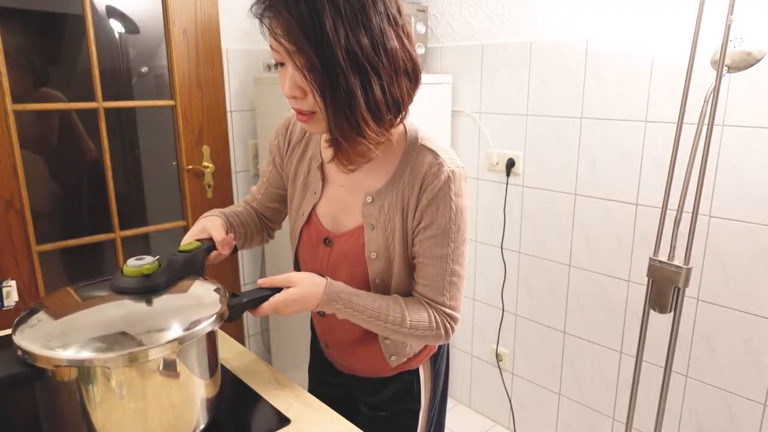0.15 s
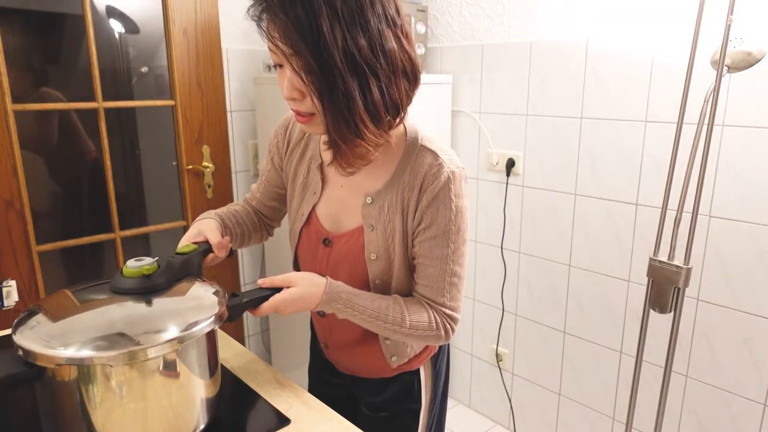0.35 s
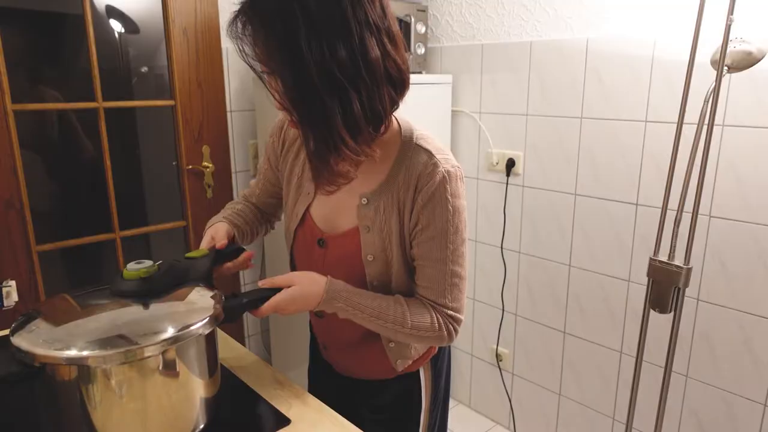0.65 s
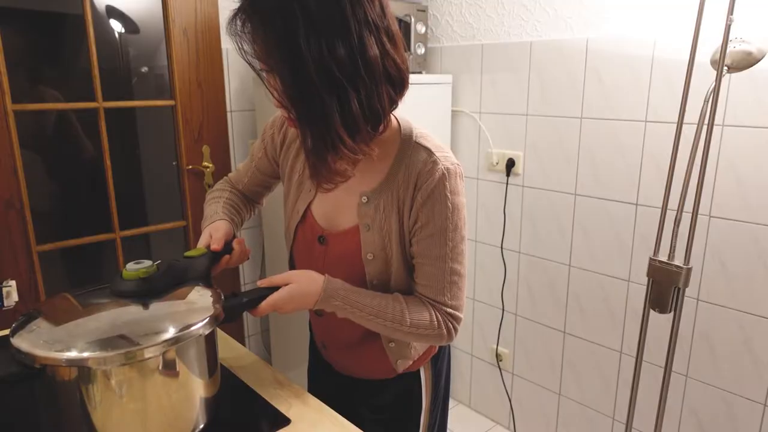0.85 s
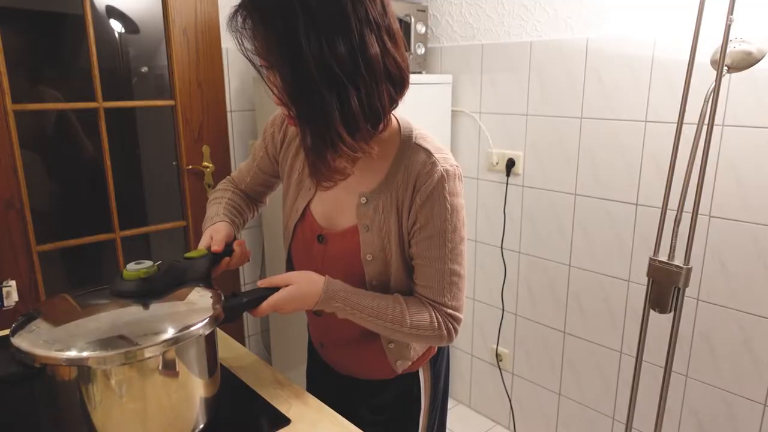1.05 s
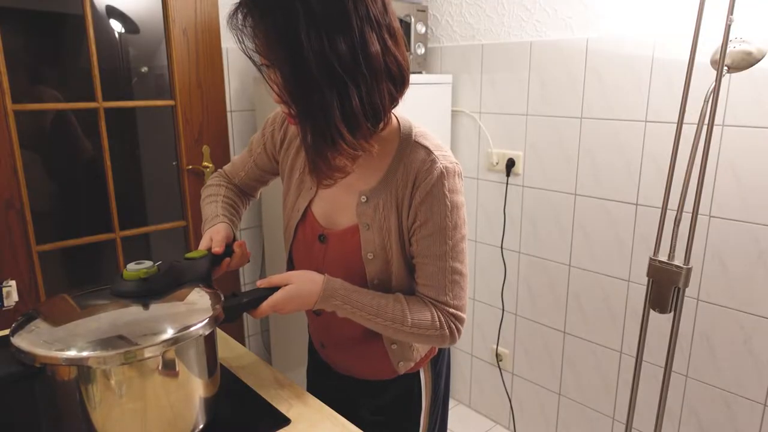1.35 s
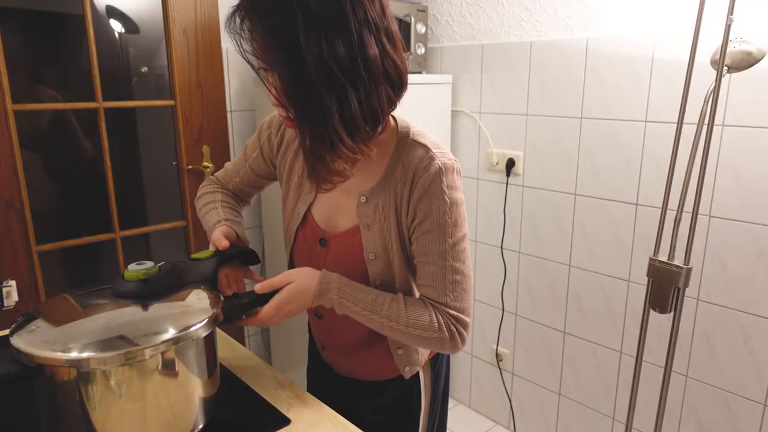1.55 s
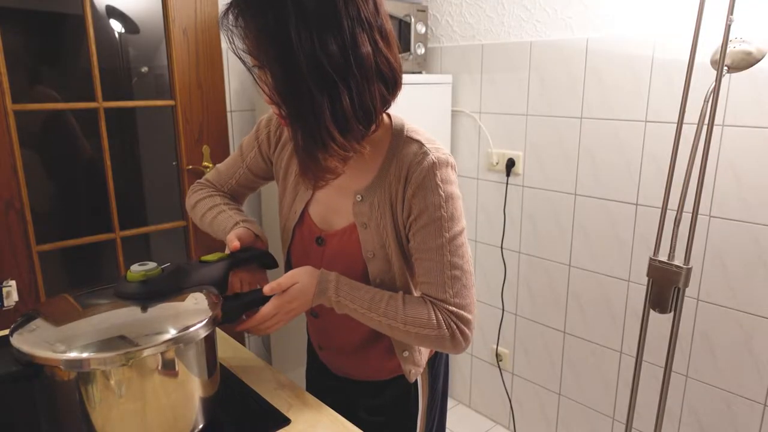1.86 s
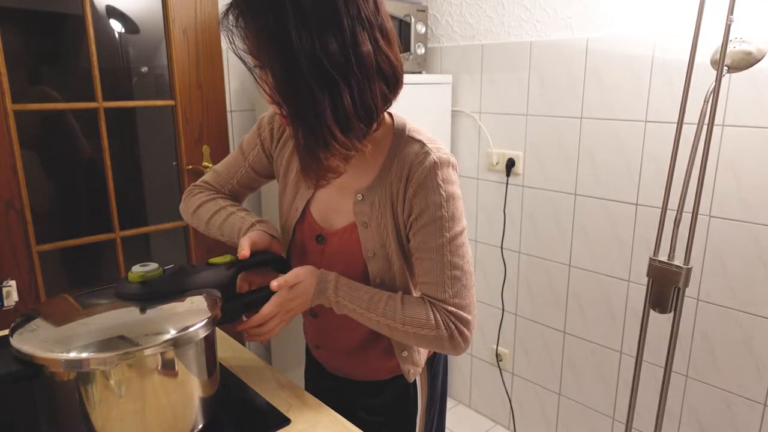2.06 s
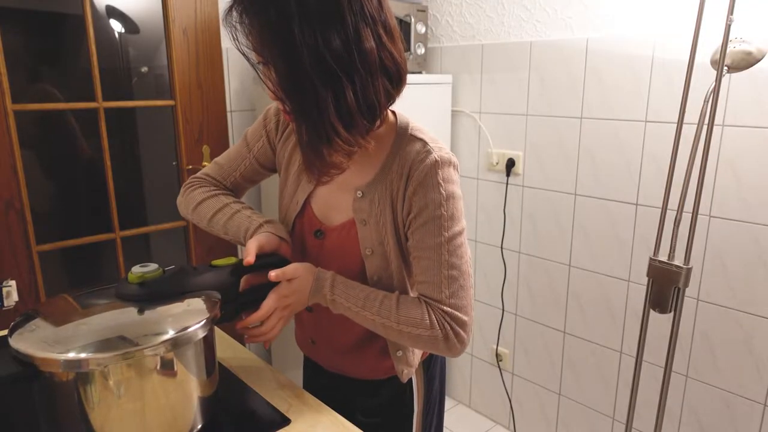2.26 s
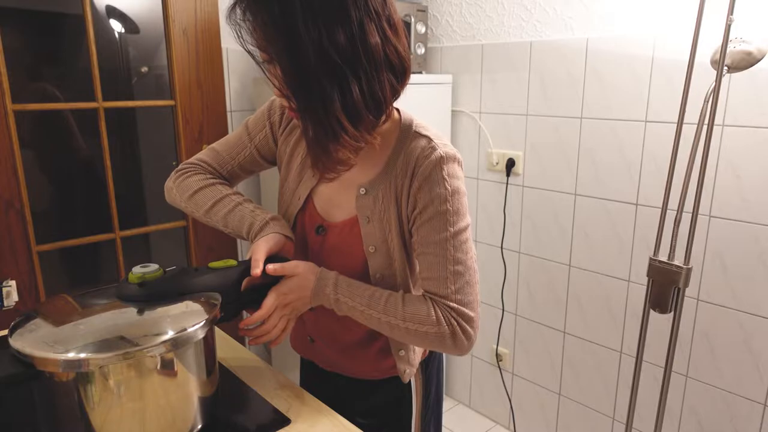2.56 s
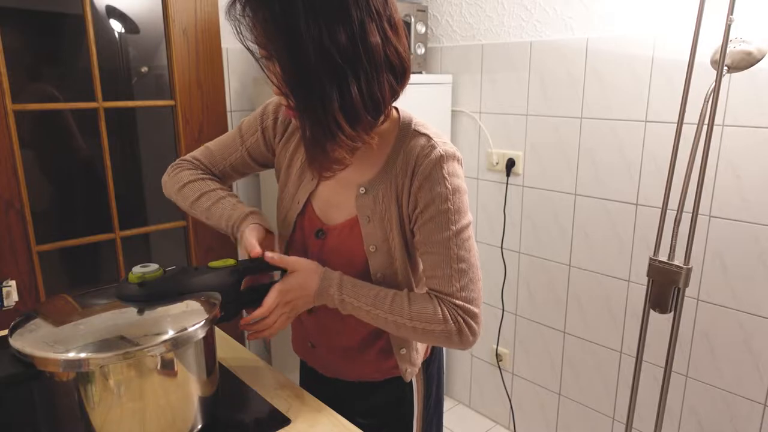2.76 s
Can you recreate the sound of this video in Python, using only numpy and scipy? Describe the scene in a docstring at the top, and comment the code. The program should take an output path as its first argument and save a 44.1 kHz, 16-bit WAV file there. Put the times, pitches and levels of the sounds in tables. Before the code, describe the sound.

A metal pot lid drops and rattles on the rim, is turned, and locks with a loud metallic snap

```python
"""In a small tiled kitchen a steel pressure cooker lid drops on its pot, rocks, scrapes and settles: noise bursts
excite its modes while the air in the pot groans. After an abrupt cut the lid is turned: shaped noise makes the
gasket hiss and the hands rub, the plastic handles knock and grind as damped modes, with a sharp tick and a brief
hum of the pot. Last, the lock snaps shut in a cluster of short metallic blows. Quiet room air and low shaking
lie under it all."""
import sys
import numpy as np
from scipy import signal
from scipy.fft import rfft, irfft
from scipy.io import wavfile
from scipy.ndimage import uniform_filter1d

SR = 44100
rng = np.random.default_rng(int(sys.argv[2]) if len(sys.argv) > 2 else 0)


def file_out(sig):
    """Save sig as 16-bit WAV at sys.argv[1]."""
    # one column per channel
    cols = np.atleast_2d(sig).T
    # limit, then scale
    lim = np.clip(cols, -1, 1)
    pcm = np.round(lim * 32767).astype(np.int16)
    wavfile.write(sys.argv[1], SR, pcm)


def invert_db(x):
    """Field ratio 10**(x/20) for x, a level in decibels (scalar or array-like)."""
    u = np.asarray(x, float) / 20
    return 10 ** u


N = 127890
CUT_S = .654  # the first shot ends here

# Blow tables: start_s, level_db, tilt_db_per_octave, chatter_s, ring_to_crack_db
# Mode tables: pitch_hz, level_db, t60_s
# Colour and crack tables: frequency_hz, density_db (per Hz)
# Lid striking the rim (blows)
LID_BLOWS = [(0, -51.5, -1, 0.021, -37), (.1365, -9.5, 1, 0.01, -8), (.1890, -18.5, -0.2, 0.0035, 1.5),
             (.3290, -27.5, 0.3, 0.0083, -12), (.379, -34, 3, 0.00096, -2), (.4492, -41.5, 5, 0.0047, -4),
             (.4654, -34.5, -2.5, 0.012, -11.5), (.4865, -26, -2.5, 0.0025, 0),
             (.5307, -40.5, -3, 0.0062, -11), (.61, -31.5, -1.5, 0.0028, -2),
             (.6412, -34.5, -3.5, 0.0023, 7), (.7994, -41.5, -4.5, 0.0022, -22)]
# Lid touching the rim softly (blows)
LID_TOUCHES = [(.098, -42.5, 3, 0.0027, -28), (.568, -40, 0.5, 0.041, -27), (.768, -44.5, -2, 0.012, -8.5),
               (.96, -51.5, 1.5, 0.023, -5.5), (1.255, -60.5, 2, 0.023, -21),
               (1.435, -52.5, 3, 0.034, -11.5)]
# Lid resonances (modes)
LID_MODES = [(590, -14, .1), (810, -17, .07), (1020, -12, .08), (1170, -12, .12), (1680, -7, .06),
             (2186, -3, .06), (2665, -8, .05), (3316, -2, .045), (4630, -4, .04), (5459, -5, .04),
             (6368, -8, .035), (7000, -9, .08), (7892, -8, .03), (9329, -12, .03)]
# Broad contact noise of a lid blow (crack)
LID_CRACK_COLOUR = [(350, -40), (600, -5), (1410, -12), (2760, -6.5), (3300, -2), (3630, -8), (7830, -10.5),
                    (13600, -15), (16000, -31.5)]
# Broad contact noise of a soft touch (crack)
TOUCH_CRACK_COLOUR = [(240, -28), (400, -7), (1420, -14), (1710, -1.5), (2360, -25), (2930, -15.5),
                      (3690, -20.5), (13500, -28), (16000, -31)]
# Lid scraping on the rim while it rocks: time_s, level_db (before a trim)
SCRAPE_LEVEL = [(0.0, -44.5), (0.062, -76.5), (0.228, -34), (0.33, -47.5), (0.468, -57), (0.578, -58),
                (0.654, -51)]
# Steel grinding on steel (colour)
SCRAPE_SPECTRUM = [(290, -28), (500, 5), (831, -5.5), (1190, -7), (1740, -8), (7100, -24), (12000, -20),
                   (16000, -34)]
# Air in the pot groaning in bursts: time_s, rms_level_db
GROAN_LEVEL = [(.134, -51), (.14, -23), (.149, -42.5), (.162, -33.5), (.184, -56), (.192, -33.5),
               (.235, -52), (.253, -31), (.265, -47), (.3, -42), (.315, -60), (.335, -46), (.348, -27),
               (.362, -51), (.395, -50), (.41, -55), (.444, -46), (.453, -32), (.475, -50), (.5, -51),
               (.558, -54.5), (.572, -35.5), (.592, -34), (.603, -47), (.612, -35), (.654, -49.5)]
# Pitch of the groan, lower as the lid closes: time_s, pitch_hz
GROAN_PITCH = [(.134, 462), (.165, 436), (.25, 404.3), (.285, 356.5), (.35, 379.7), (.46, 348.4),
               (.654, 370.6)]
# The hob answering the groan: time_s, rms_level_db
HOB_LEVEL = [(.134, -56), (.26, -46), (.325, -58), (.35, -40.5), (.41, -78), (.455, -41.5), (.5, -72)]
# Plastic handles knocking (blows)
HANDLE_BLOWS = [(1.4995, -14.5, 0.5, 0.0066, -20), (1.556, -30.5, -1.5, 0.016, -13.5),
                (1.574, -27.5, -0.5, 0.006, 0), (1.589, -30, -2.5, 0.00444, -1.5),
                (1.861, -48, -7, 0.03, -28), (1.92, -48.5, -4.5, 0.028, -14), (2.0, -43.5, -21, 0.008, 9.5),
                (2.21, -44, -4.5, 0.01, -11), (2.395, -47, -1.5, 0.0058, -6.5)]
# Handle resonances when free (modes)
HANDLE_MODES = [(295, -1, 0.02), (385, -2, 0.11), (612, -8, 0.06), (643, -2.5, 0.027), (940, -4, 0.061),
                (1150, -17, 0.18), (1590, -10, .03), (2695, -19, 0.037), (7400, -28, 0.07),
                (11340, -25, 0.08)]
# Broad contact noise of a handle knock (crack)
HANDLE_CRACK_COLOUR = [(150, -27), (250, -9.5), (576, -8.5), (971, -3), (2280, -18.5), (4190, -22),
                       (9330, -17), (16000, -26.5)]
# Sharp tick while the handles turn, then the lock closing (blows)
TICK_AND_LOCK_BLOWS = [(1.9953, -32.5, -6, 0.0021, -7), (2.5222, -17, -4.5, 0.0018, -16.5),
                       (2.5256, 1, 1, 0.0029, -13), (2.53, -8, 2, 0.011, -12), (2.541, -8, 2, 0.02, -8),
                       (2.55, -9, -1, 0.021, -9.5)]
# Lock resonances, lent to the tick (modes)
LOCK_MODES = [(1235, -33, 1.1), (1872, -6, .06), (2611, -3, .09), (3047, -2, .09), (3488, -6, .06),
              (3963, -1, .09), (4475, -9, .025), (5518, -6, .06), (5078, -7, .06), (8966, -7, .06),
              (10083, -8, .05)]
# Broad contact noise of the lock, lent to the tick (crack)
LOCK_CRACK_COLOUR = [(59, -54.5), (100, -18), (836, -24), (1200, -2.5), (1520, -14), (1830, -2), (2130, -6),
                     (3860, -3), (12400, -7.5), (16000, -18.5)]
# Gasket sliding on the rim: time_s, rub_db, hiss_db
GASKET_LEVEL = [(.654, -48, -59), (.668, -60, -57), (.672, -57.5, -55), (.70, -63, -49),
                (.735, -56.5, -51.5), (.77, -61.5, -57.5), (.805, -59.5, -55), (.84, -75, -68),
                (.9, -80.5, -90)]
# Broad rub of the rubber (colour)
GASKET_RUB_SPECTRUM = [(240, -39.5), (400, -7), (615, -6), (858, 0), (3480, -4), (11000, -4),
                       (14300, -40.5), (22000, -120)]
# Fine high hiss of the rubber (colour)
GASKET_HISS_SPECTRUM = [(9000, -40), (11500, -8), (12500, -6), (14200, -3.5), (15600, -8), (16500, -27.5)]
# Hands turning the handles: time_s, rub_db, creak_db (before trims)
TURN_LEVEL = [(1.62, -64, -68), (1.686, -68, -66), (1.78, -68.5, -55), (1.812, -63.5, -62),
              (1.828, -64.5, -54), (1.946, -59, -55), (2.008, -67, -52), (2.022, -66, -66),
              (2.138, -68, -64), (2.242, -62.5, -57), (2.276, -69, -70), (2.352, -68, -70.5),
              (2.404, -75.5, -64), (2.48, -82.5, -90.5), (2.5, -76.5, -75.5)]
# Skin and plastic rubbing (colour)
TURN_RUB_SPECTRUM = [(710, -21.5), (1200, -0.5), (2350, -5), (4750, -7), (6370, -7.5), (11200, -10.5),
                     (16000, -14)]
# Pot, lid, worktop and hollow handle bumping on one resonance each:
# start_s, peak_level_db, pitch_hz, t60_s, rise_s
BUMPS = [(0, -55, 149.5, 0.56, 0.0068), (0.74, -54.5, 126.7, 0.13, 0.0036), (0.815, -52, 55, 0.23, 0.0057),
         (0.86, -62, 46.7, 0.96, 0.03), (1.499, -34, 197, 0.079, 0.0018), (0.781, -58, 198.3, 0.13, 0.004),
         (0.981, -62, 1203, 0.11, 0.0051), (1.4993, -26.5, 706, 0.026, 0.00045),
         (1.5006, -40.5, 955, 0.21, 0.0013), (1.567, -43.5, 190, 0.17, 0.0065),
         (1.73, -58, 139, 0.19, 0.0122), (1.858, -48, 373, 0.091, 0.0052), (1.574, -36, 387.4, 0.055, .005),
         (2.21, -55, 200, 0.18, 0.0081), (2.543, -49, 138, 0.13, 0.0031)]
# Pot humming on the hob while the handles grind together: time_s, level_db
HUM_LEVEL = [(1.915, -66), (1.935, -47.5), (1.96, -47.5), (1.985, -50.5), (2.0, -44), (2.026, -42),
             (2.038, -76), (2.06, -79)]
# Decay of the room: frequency_hz, t60_s
ROOM_DECAY = [(100, 0.24), (500, 0.28), (2000, 0.25), (6000, 0.2), (16000, 0.22)]
# Colour of the tail, with a dip near 7.4 kHz as from the microphone: frequency_hz, gain_db
ROOM_TAIL_GAIN = [(5500, 0.5), (7400, -5), (9500, 3.5)]
# Room air and microphone hiss (colour)
AIR_SPECTRUM = [(15, -29), (40, -5), (192, -15.5), (245, -23.5), (296, -14), (339, -25), (651, -25.5),
                (787, -31.5), (4240, -41), (16500, -46.5)]
# Floor and worktop shaking: time_s, level_db (before a trim)
SHAKE_LEVEL = [(0.0, -34), (0.11, -50), (0.15, -42), (0.37, -37), (0.73, -62), (0.81, -49.5), (1.08, -67),
               (1.47, -72), (1.52, -35), (1.97, -69), (2.03, -58), (2.05, -97), (2.54, -53), (2.9, -77)]

# Relative spread of the partials in each mode: ordinary parts, and thick parts with cleaner lines
SPLIT, TIGHT_SPLIT = .018, .005
BUMP_ROOM_DB = -3.5  # bumps and groans wake the room less


def curve(rows, col=1):
    """Linear interpolation: one column of a time table per sample, -140 outside."""
    r = np.array(rows, float)
    return np.interp(np.arange(N) / SR, r[:, 0], r[:, col], left=-140, right=-140)


def unit(x):
    """Normalisation: mean power 1."""
    return x / np.sqrt(np.mean(x ** 2) + 1e-30)


def colour(x, points, tilt_db=0.):
    """Minimum-phase filtering: a causal response from (Hz, dB) points, tilted per octave about 2 kHz."""
    n, p = len(x) // 2 * 2, np.array(points, float)
    f = np.maximum(np.fft.rfftfreq(n, 1 / SR), 10)
    db = np.interp(np.log(f), np.log(p[:, 0]), p[:, 1]) + tilt_db * np.log2(f / 2000)
    # folding the cepstrum forward in time makes the filter causal
    cepstrum = irfft(np.log(invert_db(db)), n)
    cepstrum = np.concatenate([cepstrum[:1], 2 * cepstrum[1:n // 2], np.zeros(n // 2)])
    return irfft(rfft(x, n) * np.exp(rfft(cepstrum)), n)


def walk(rate):
    """Slow random modulation: normal levels held for 1 / rate seconds and slewed."""
    k = max(int(SR / rate), 2)
    return uniform_filter1d(np.repeat(rng.standard_normal(N // k + 1), k), k)[:N]


def add(out, x, s):
    """Superposition: mix x into out from time s."""
    i = int(max(s, 0) * SR)
    out[i:i + len(x)] += x[:N - i]


def rings(modes, scatter_db=3., tilt_db=0., split=SPLIT):
    """Modal impulse response: each mode is a cluster whose strength depends on where it is struck."""
    partials = np.repeat(np.array(modes, float), repeats=5, axis=0)
    t = np.arange(SR // 3) / SR
    scatter = rng.standard_normal((len(partials), 2))
    tilt = tilt_db * np.log2(partials[:, 0] / 2000)
    gain = invert_db(partials[:, 1] + scatter_db * scatter[:, 0] + tilt)
    hz = partials[:, :1] * (1 + split * scatter[:, 1:])
    decay = np.exp(-np.log(1000) * t / np.maximum(partials[:, 2:], .01))
    return gain @ (np.sin(2 * np.pi * hz * t) * decay)


def hits(events, modes, crack_colour, rise_s=0.00014, dull_db=0., split=SPLIT):
    """Impact excitation: a brief chatter of contact gives a broad crack and drives the object's modes."""
    out, t = np.zeros(N), np.arange(SR // 6) / SR
    for s, db, tilt_db, chatter, ring_db in events:
        envelope = (1 - np.exp(-t / rise_s)) ** 2 * np.exp(-t / np.clip(chatter, .0003, .025))
        push = rng.standard_normal(len(t)) * envelope
        crack = colour(push, crack_colour, tilt_db)
        blow = signal.fftconvolve(push, rings(modes, 5.6, tilt_db + dull_db, split))
        # the crack has energy 1, the ring is set against it
        blow *= invert_db(ring_db) / np.sqrt(np.sum(blow ** 2))
        blow[:len(crack)] += crack / np.sqrt(np.sum(crack ** 2))
        # longer contact carries more energy
        add(out, invert_db(db) * blow * np.sqrt(chatter * SR / 8), s)
    return out


def lid_on_rim():
    """Impact on a steel shell: hard blows ring it, soft slow touches wake mostly its low modes."""
    clanks = hits(LID_BLOWS, LID_MODES, LID_CRACK_COLOUR)
    return clanks + hits(LID_TOUCHES, LID_MODES, TOUCH_CRACK_COLOUR, rise_s=0.0091, dull_db=-14)


def scrape():
    """Dry friction of steel on steel: uneven grains of noise, partly ringing the lid."""
    grit = rng.standard_normal(N) * invert_db(2.7 * walk(120) + 2.9 * walk(40))
    ring = unit(signal.fftconvolve(grit, rings(LID_MODES, 2.5, -2.2))[:N])
    return (unit(colour(grit, SCRAPE_SPECTRUM)) + invert_db(-12) * ring) * invert_db(curve(SCRAPE_LEVEL) - 6.0)


def groan():
    """Cavity resonance: the pot's air sounds an unsteady, gritty tone and the hob answers below."""
    air_hz = np.maximum(curve(GROAN_PITCH), 0) * (1 + .02 * walk(70))
    air = np.sin(2 * np.pi * np.cumsum(air_hz) / SR) * invert_db(curve(GROAN_LEVEL) + 1.5 * walk(150))
    hob_hz = 198.3 * (1 + .06 * walk(50))
    hob = np.sin(2 * np.pi * np.cumsum(hob_hz) / SR) * invert_db(curve(HOB_LEVEL) + 3 * walk(60))
    return np.sqrt(2) * (air + hob)  # a sine of rms 1 peaks at root 2


def gasket():
    """Sliding friction of rubber on steel: a broad rub and a fine high hiss."""
    rub = unit(colour(rng.standard_normal(N), GASKET_RUB_SPECTRUM))
    hiss = unit(colour(rng.standard_normal(N), GASKET_HISS_SPECTRUM))
    rub = rub * invert_db(curve(GASKET_LEVEL) + 0.5 * walk(49.8))
    return rub + hiss * invert_db(curve(GASKET_LEVEL, 2) + 1.5 * walk(40))


def handle_knocks():
    """Impact on plastic: the handles crack together and ring on their modes."""
    return hits(HANDLE_BLOWS, HANDLE_MODES, HANDLE_CRACK_COLOUR)


def turning():
    """Stick-slip friction: skin and plastic rub while uneven slips shake the hand-damped handle."""
    rub = unit(colour(rng.standard_normal(N), TURN_RUB_SPECTRUM))
    rub = rub * invert_db(curve(TURN_LEVEL) + 1.5 + 1.7 * walk(100))
    slips = rng.standard_normal(N) * invert_db(1.3 * walk(110))
    held = [(hz, db, 0.12 * t60) for hz, db, t60 in HANDLE_MODES]  # the hand shortens the ring
    body = unit(signal.fftconvolve(slips, rings(held, 0., 3.9))[:N])
    return rub + body * invert_db(curve(TURN_LEVEL, 2) - 0.5)


def tick_and_lock():
    """Impact on thick parts: a sharp tick, then the lock's blows, ring on narrow clusters of partials."""
    return hits(TICK_AND_LOCK_BLOWS, LOCK_MODES, LOCK_CRACK_COLOUR, split=TIGHT_SPLIT)


def swell(hz, t60, rise):
    """Damped oscillation: one soft push on a resonance, envelope peak 1."""
    t = np.arange(SR // 2) / SR
    env = (1 - np.exp(-t / max(rise, .0005))) ** 2 * np.exp(-np.log(1000) * t / max(t60, .02))
    return np.sin(2 * np.pi * hz * t) * env / env.max()


def thuds():
    """Single-mode response: soft bumps of pot, lid, worktop and hollow handle, mostly low."""
    out = np.zeros(N)
    for s, db, hz, t60, rise in BUMPS:
        add(out, invert_db(db) * swell(hz, t60, rise), s)
    return out


def hum():
    """Frequency modulation: a firm low tone wavers about 183 Hz, with a higher mode at 3.8 times its pitch."""
    phase = 2 * np.pi * np.cumsum(183 * (1 + 0.037 * walk(30))) / SR
    return (np.sin(phase) + invert_db(-12) * np.sin(3.8 * phase)) * invert_db(curve(HUM_LEVEL))


def room(x):
    """Reverberation of tiled walls: a dense tail builds quickly and dies band by band."""
    t, tail, r = np.arange(SR // 2) / SR, 0, np.array(ROOM_DECAY, float)
    gap_s, build_s, tail_db = 0.0049, 0.0018, -3.5
    for hz in 60 * 2. ** np.arange(9):
        t60 = np.interp(np.log(hz), np.log(r[:, 0]), r[:, 1])
        octave = [(hz / 2, -40), (hz / 1.5, -5), (hz, 0), (hz * 1.5, -5), (hz * 2, -40)]
        band = colour(rng.standard_normal(len(t)), octave)
        bass = invert_db(1.5 * max(np.log2(1000 / hz), 0))  # dB per octave under 1 kHz
        tail = tail + band * np.exp(-np.log(1000) * t / t60) * bass
    tail = colour(tail, ROOM_TAIL_GAIN) * np.clip((t - gap_s) / build_s, 0, 1)
    return x + signal.fftconvolve(x, tail * invert_db(tail_db) / np.sqrt(np.sum(tail ** 2)))[:N]


def kitchen():
    """Background noise by filtering: quiet room air and microphone hiss, with low shaking that comes and goes."""
    air = unit(colour(rng.standard_normal(N), AIR_SPECTRUM)) * invert_db(-65 + 2.0 * walk(2.3))
    low_spectrum = [(18, -11.0), (45, -6.5), (80, -11.5), (115, -5.5), (200, -41.5), (1000, -78.5)]
    low = unit(colour(rng.standard_normal(N), low_spectrum))
    return air + low * invert_db(curve(SHAKE_LEVEL) - 8.5 + 2 * walk(12.0))


def scene():
    """Superposition of two shots: the first, with its reverberation, stops at the cut; the second carries on."""
    t = np.arange(N) / SR
    lid, air = lid_on_rim(), groan()
    first = room(lid + scrape() + invert_db(BUMP_ROOM_DB) * air) + air
    first = first * np.clip((CUT_S - t) / 0.00043, 0, 1)
    second = lid * (t > CUT_S + .1) + handle_knocks() + tick_and_lock() + turning()
    bumps = thuds() + hum()
    second = room(second + invert_db(BUMP_ROOM_DB) * bumps) + bumps
    return (first + second + gasket() + kitchen())[None]


def low_pass(x):
    """Removes everything above the highest recorded frequency."""
    return signal.sosfilt(signal.butter(12, 16920, fs=SR, output="sos"), x)


def record(dry):
    """Band limiting and soft saturation: the microphone cuts the top and rounds the loudest peak."""
    lowpass = signal.ellip(8, .2, 70, 15950, fs=SR, output="sos")
    limited = signal.sosfilt(lowpass, dry)
    ceiling = .95
    mix = limited / (1 + (limited / ceiling) ** 6) ** (1 / 6)
    return low_pass(mix)


dry = scene()
out = record(dry)
file_out(out)
```